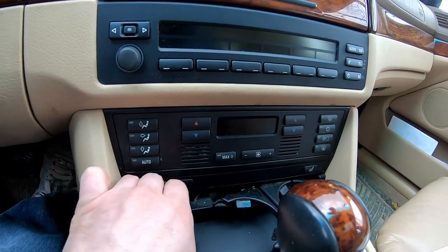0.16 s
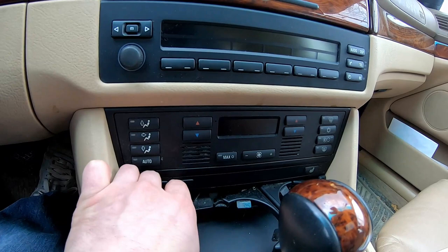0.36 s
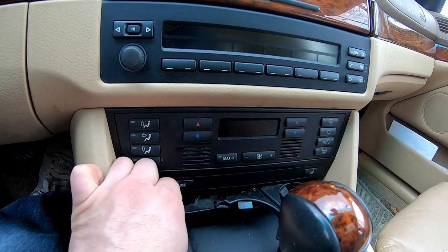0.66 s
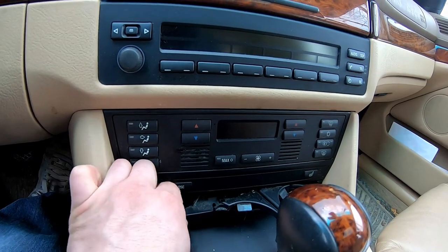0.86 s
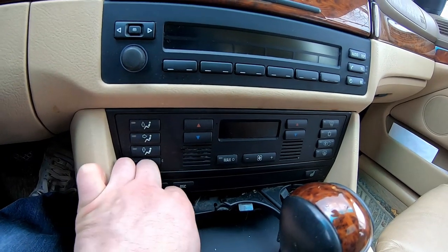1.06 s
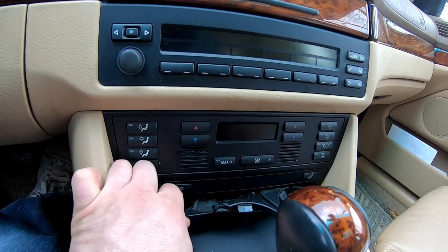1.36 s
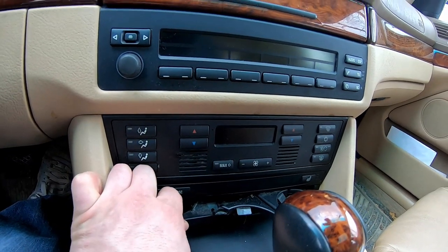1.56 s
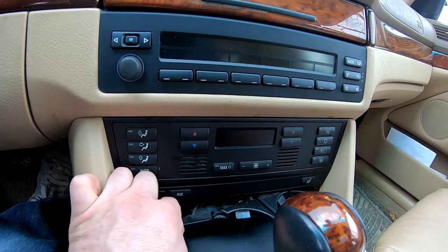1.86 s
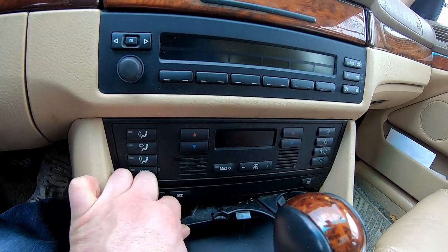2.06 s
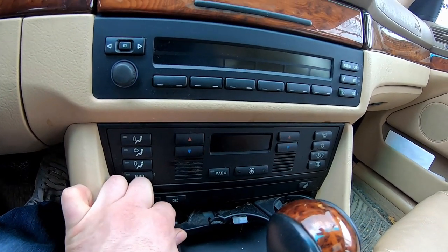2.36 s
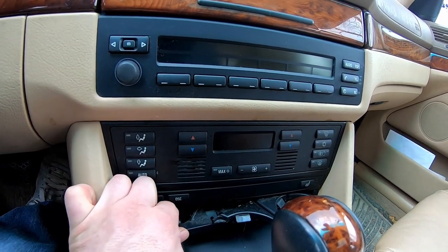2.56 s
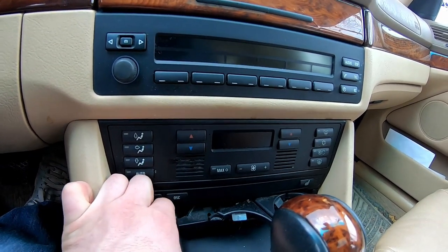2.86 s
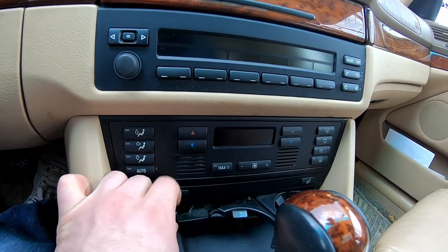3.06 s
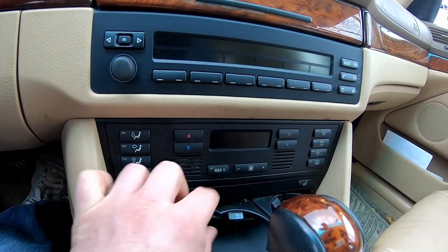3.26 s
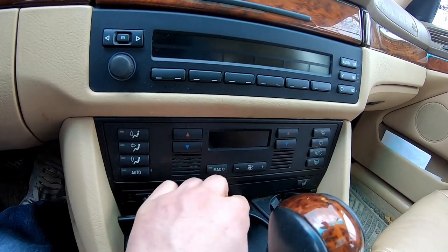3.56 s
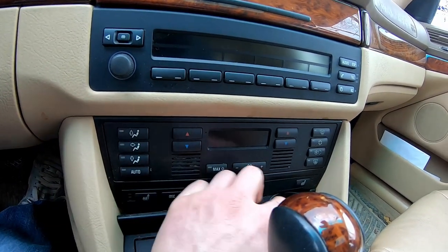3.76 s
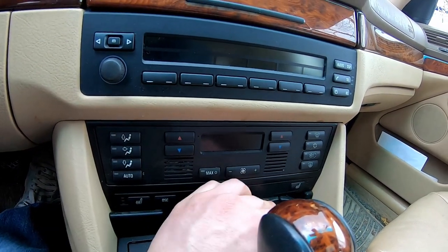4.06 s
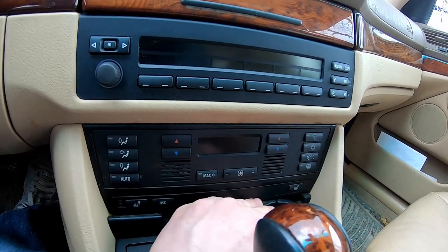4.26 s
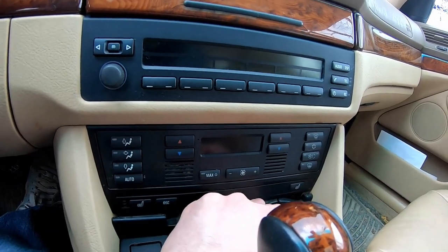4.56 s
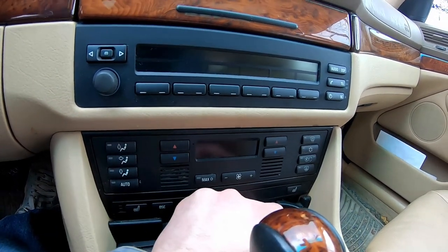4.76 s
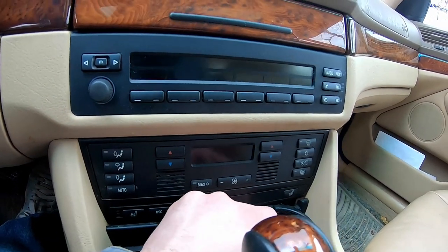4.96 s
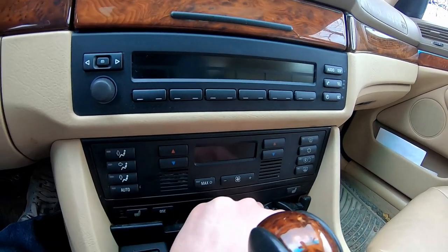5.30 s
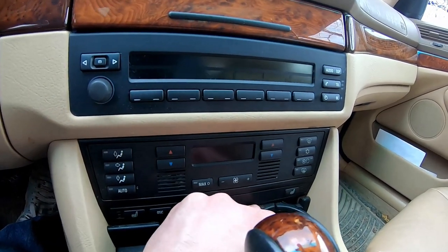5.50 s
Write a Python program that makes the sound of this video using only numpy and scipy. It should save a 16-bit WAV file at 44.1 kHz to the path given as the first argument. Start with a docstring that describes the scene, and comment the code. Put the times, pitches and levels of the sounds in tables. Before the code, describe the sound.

A plastic trim piece is worked loose by hand from a car's center console, heard close up in the quiet, closed cabin with almost no echo. Light ticks and soft rubbing open the scene. At about 0.7 seconds comes the loudest snap, with a hollow knock and a brief rattle. Faint ticks follow, then a click at 1.8 and another sharp snap and knock at 2 seconds, after which a loose part buzzes briefly. It goes quieter until a third snap and thump at 2.9 seconds. From there the work gets busier: short scrapes, clicks and knocks stand out around 3.5, 4.1 and 4.4 seconds, and smaller clusters of clicks and rattles run from 4.7 to 5.5 seconds. Between the snaps, hand and sleeve rub softly over the plastic.

```python
"""A plastic trim piece is worked loose from a car's centre console by hand, close up in the closed cabin.
Clips snap and edges tick, ringing the panel; freed parts chatter against their seats.
The hollow console knocks and sets the cabin air booming, and the piece scrapes in short stick-slip runs.
Hand and sleeve rub over the plastic in between; the upholstered cabin adds only a short tail."""
import sys
import numpy as np
from scipy import signal
from scipy.fft import rfft, irfft
from scipy.io import wavfile
from scipy.ndimage import uniform_filter1d

SR = 44100
rng = np.random.default_rng(int(sys.argv[2]) if len(sys.argv) > 2 else 0)


def master_out(mix):
    """Clip the mix to full scale and print it as 16-bit PCM to the path in sys.argv[1]."""
    frames = np.transpose(np.atleast_2d(mix))
    ceiling = np.clip(frames, -1, 1)
    pcm = np.round(ceiling * 32767).astype(np.int16)
    wavfile.write(sys.argv[1], SR, pcm)


N = 248503
TIME = np.arange(N) / SR
AGE = TIME[:SR // 2]  # seconds since the start of one hit

# ring of the trim panel: f/Hz, nominal width/Hz, weight/dB (applied at half)
PANEL_MODES = [(784, 78, 2.5), (905, 91, -11.5), (1118, 45, -14.5), (1346, 13, -14), (1824, 23, -12),
               (2104, 51, -14.5), (2432, 45, -6.5), (3085, 32, -9.5), (3394, 42, -14), (3470, 75, -5.5),
               (3780, 97, -12.5), (4100, 67, -11), (4230, 42, -24), (4460, 52, -14), (4940, 64, -3),
               (6800, 71, -20.5), (7200, 44, -26.5), (7640, 27, -13.5), (8430, 160, -18)]
# tone of the plastic: f/Hz, level/dB
PLASTIC_EQ = [(180, -22.5), (300, 1.5), (391, -4.5), (573, -13.5), (798, -16.5), (1010, -13), (1380, -8),
              (1630, -13), (2120, -15), (2640, -16), (3610, -18.5), (6040, -27), (8280, -25.5),
              (10300, -39.5), (15800, -60.5)]
# tone of the cabin's air bed: f/Hz, level/dB
CABIN_EQ = [(12, -40), (20, 6), (55, -2.5), (113, -14.5), (182, -4), (570, -23.5), (775, -16.5),
            (2120, -26), (7440, -29.5), (15800, -50.5)]
# tone of skin and cloth: f/Hz, level/dB
CLOTH_EQ = [(59, -39.5), (100, -7), (224, 10), (500, -14.5), (619, -11), (925, -16), (1030, -29),
            (1270, -10.5), (1860, -11.5), (2560, -9.5), (3510, -15.5), (5970, -28.5), (8030, -22.5),
            (14500, -48), (15800, -60.5)]
# hand sliding over the plastic: t/s, level/dB, treble level/dB
RUB_LEVELS = [(0.0, -50.5, -58.5), (0.3, -55.5, -84), (0.61, -52, -65.5), (0.92, -63, -76),
              (1.46, -67.5, -65), (1.79, -66, -75), (1.99, -51, -85), (2.16, -61.5, -77),
              (2.51, -70.5, -79.5), (2.92, -84, -80.5), (3.07, -61.5, -80), (3.42, -59.5, -60.5),
              (3.65, -49, -54.5), (4.08, -54.5, -57), (4.23, -64.5, -63.5), (4.37, -58, -70),
              (4.58, -64.5, -68), (5.33, -57, -64), (5.43, -56, -71), (5.63, -56, -63)]
# sleeve brushing past: middle t/s, level/dB, half length/s
SLEEVE_SWISHES = [(.85, -72.5, .03), (1.46, -73, .08), (1.79, -72, .05), (2.666, -64.5, .05)]
# an edge dragging over its seat: middle t/s, level/dB, half length/s, treble re mids/dB
EDGE_SCRAPES = [(.09, -49, 0.0087, -27), (0.381, -50, 0.012, -12), (.665, -29.5, 0.0084, -10),
                (1.029, -54.5, .017, 4), (1.138, -44, 0.0096, -4), (1.98, -43, 0.0094, -20),
                (2.099, -59.5, 0.042, -12), (2.896, -52, .008, -8.5), (3.136, -39, 0.013, -4),
                (3.172, -44, 0.019, -0.5), (3.295, -41, .012, 1), (3.531, -29, 0.014, -14),
                (3.827, -47.5, 0.029, -7), (4.032, -50.5, .025, -10), (4.121, -23.5, 0.0034, -18),
                (4.17, -36.5, 0.0096, -11.5), (4.23, -54, 0.015, 2.5), (4.385, -30, .0013, -21),
                (4.751, -49, .0065, -1), (4.885, -45, 0.015, -9), (5.226, -50, 0.014, -10),
                (5.323, -41, 0.017, -7), (5.45, -51.5, 0.028, -8), (5.589, -50, 0.037, -25)]
# clips and edges snapping: t/s, level/dB, body re mids/dB, treble re mids/dB, ring f/Hz, crack/dB
CLIP_SNAPS = [(0.082, -38, -0.5, -30, 826, 10), (.185, -36.5, 3, -19, 815, -3),
              (.2918, -42.5, -9, -20, 760, 9), (.3282, -43, -21.5, -20.5, 1262, 9),
              (.4708, -42.5, 3, -18, 1550, -2), (0.6713, -12.5, -2.5, -11.5, 1360, -3),
              (0.6722, -13.5, -6, -21, 1860, 4), (.6784, -27, 0, -5.5, 785, -14),
              (0.7253, -21.5, -6, -14, 2170, 9), (.7994, -46.5, 0, -27, 750, 14),
              (1.0123, -49.5, -2.5, 6.5, 784, -13), (1.0498, -45.5, -1.5, -6, 3140, 2),
              (1.104, -47, -9, -27, 795, -14), (1.1259, -33.5, -5, -31, 2430, 10),
              (1.1677, -41.5, -22, -10, 3150, 8), (1.176, -39.5, -22, -11, 2250, 19),
              (1.1856, -38.5, -27, -12, 2100, 12), (1.196, -53, 11, -20, 1140, 7),
              (1.241, -54.5, 6, -22, 810, 0), (1.563, -48, 5.5, -9.5, 680, 8),
              (1.716, -50.5, 2, -23, 1440, -16), (1.8343, -25.5, -9.5, -2.5, 2040, 1),
              (1.938, -53.5, 11, -2, 1170, -5), (1.9821, -12.5, -1.5, -24, 1050, 12),
              (1.9881, -23.5, 5, -11.5, 908, 6), (2.0121, -33.5, -9, 0.5, 700, -3),
              (2.0391, -27.5, -4, -15, 1240, 14), (2.0545, -31.5, 0.5, -16.5, 1270, -4),
              (2.2343, -57.5, -5, -24, 1830, -3), (2.3109, -40, -9, -13, 1170, 12),
              (2.386, -50.5, -14, -9, 2190, 5), (2.4682, -57, -9, -6, 1220, -4),
              (2.9107, -15.5, -2.5, -17, 1120, 1.5), (2.9339, -34.5, 3, -5.5, 740, -2),
              (2.9502, -33, 1.5, -8.5, 1220, -13), (2.9855, -33, -6, -1, 5100, 6),
              (2.9924, -39.5, 0, -10, 1220, 0), (3.1309, -39.5, 5.5, -7, 1840, 6),
              (3.4851, -34.5, -2, -8.5, 3970, -7), (3.5141, -42.5, 17.5, -18, 990, -12),
              (3.5277, -24.5, -6, -14, 950, 6), (3.564, -29.5, 1, -7.5, 820, 5.5),
              (3.6967, -37, -2.5, -22, 1000, 26), (3.7742, -43.5, -13, 2.5, 3460, -13),
              (4.0821, -33, 0.5, -18, 945, -2), (4.1218, -21.5, -2.5, -9, 760, -6),
              (4.1496, -24, -2.5, -15, 1250, -9), (4.1978, -33.5, .5, -15, 2460, 3),
              (4.3228, -45.5, -1, -3.5, 1080, -12), (4.3714, -41, -16, -7, 920, -17),
              (4.3823, -17, -15.5, -10.5, 940, 8.5), (4.4172, -28, 2.5, -11, 767, 8),
              (4.747, -28, -2.5, -7.5, 1737, 0), (4.859, -32, 3.5, -14.5, 1340, -12),
              (4.869, -33, 2.5, -13, 780, -23), (4.9905, -48, -2, -19, 884, 7),
              (5.1005, -43.5, -12, 1, 3300, 6), (5.2308, -33.5, -6, 0, 3530, -6),
              (5.2418, -26, 2, -24, 1120, -9), (5.256, -29.5, -0.5, -4, 910, -19),
              (5.4125, -32, 1, -12, 850, -27), (5.468, -42.5, 6.5, -12, 766, -3),
              (5.4921, -38.5, -2.5, -10, 920, -27), (5.5168, -42, -6, -2.5, 1120, -4)]
# blows to the console: t/s, level/dB, f/Hz, boom send/dB, deep sway send/dB
CONSOLE_KNOCKS = [(.093, -39, 222, -12, -19), (.186, -41, 242, -4, -30), (.388, -39.5, 227, -9.5, -25),
                  (.569, -35.5, 200, -13, -31), (.671, -22.5, 264, -4, -25), (.685, -13, 239, -14, -19),
                  (.745, -36.5, 145, -8, -14), (1.126, -36, 195, -5.5, -16), (1.192, -43, 276, -12, -24),
                  (1.572, -40.5, 249, -16.5, -36), (1.986, -20.5, 226, -6.5, -9),
                  (2.008, -29, 193, -7, -14), (2.049, -38, 250, -1.5, 0.5), (2.15, -40.5, 196, -15, -30),
                  (2.913, -26, 293, -9, -5.5), (2.94, -29.5, 225, -15, -10), (2.986, -32.5, 214, -2, -16),
                  (3.134, -37.5, 235, -8.5, -15), (3.522, -28.5, 278, -27, -11),
                  (3.786, -44.5, 230, -6, -24), (4.122, -24, 199, -7, -34), (4.166, -30.5, 222, -10, -19),
                  (4.387, -38.5, 235, -2, -2.5), (4.752, -36.5, 262, -19, -22),
                  (4.867, -35.5, 234, -14, -5), (5.241, -37.5, 363, -3.5, -34), (5.253, -30, 217, -33, -21),
                  (5.344, -41.5, 198, -25, -29)]
# low modes of the cabin air, two of deep sway and then three of boom: nominal f/Hz, t60/s, level/dB
AIR_MODES = [(44.8, 0.24, -4), (65.4, 0.17, 2.5), (83, 0.05, -4.5), (111.7, 0.12, -4), (145, 0.089, -9.5)]
# loose parts buzzing: t/s, level/dB, f/Hz, t60 of the buzz/s
LOOSE_PARTS = [(0.708, -41, 1240, 0.028), (.717, -31, 878, 0.066), (.754, -54, 1180, 0.21),
               (1.563, -41.5, 650, .021), (1.566, -43, 466, 0.027), (1.984, -29, 1040, 0.017),
               (2.039, -39, 1250, 0.24), (2.042, -46.5, 743, 0.33), (2.129, -46.5, 464, 0.17),
               (2.345, -50.5, 452, 0.094), (2.44, -61, 2125, .02), (2.915, -40, 1147, 0.042),
               (2.935, -49, 1270, .15), (3.129, -34.5, 1920, 0.016), (3.17, -44.5, 1480, .13),
               (3.511, -30.5, 1157, 0.09), (4.12, -28.5, 747, 0.044), (4.383, -29, 980, 0.041),
               (4.755, -42, 380, 0.05), (4.864, -43, 780, 0.021), (5.305, -40.5, 857, 0.14),
               (5.414, -39, 878, 0.21)]
# width between the two microphone ports: f/Hz, side re mid/dB
WIDTH_EQ = [(30, -10), (130, -19.5), (300, -18), (600, -6), (2500, -7.5), (5000, -6), (8000, 1)]
# the stereo image starts narrow and opens: t/s, side level/dB
IMAGE_OPENING = [(0, -41.5), (.2, -35), (.4, -17), (.7, -8.5), (1.3, -1.5), (2, -0.5)]


def undb(db):
    """Decibels to gain."""
    return 10 ** (np.asarray(db) / 20)


def rms(x):
    """Average level, as root mean square."""
    return np.sqrt(np.mean(x ** 2))


def crest(x, size=176):
    """Level of the loudest few milliseconds."""
    return np.sqrt(uniform_filter1d(x ** 2, size, mode="constant").max())


def band(x, lo_hz, hi_hz, order=3):
    """Causal band-pass."""
    sos = signal.butter(order, [lo_hz, min(hi_hz, .45 * SR)], "band", fs=SR, output="sos")
    return signal.sosfilt(sos, x)


def response(points, size=2048):
    """Minimum-phase impulse response of an EQ curve of f/Hz, level/dB points."""
    hz, db = np.transpose(points)
    grid = np.maximum(np.fft.rfftfreq(size, 1 / SR), 1)
    curve_db = np.interp(np.log(grid), np.log(hz), db)
    cepstrum = irfft(np.log(undb(curve_db)))
    cepstrum[1:size // 2] *= 2
    cepstrum[size // 2 + 1:] = 0
    return irfft(np.exp(rfft(cepstrum)))


def through(x, impulse):
    """Pass a sound through an impulse response."""
    impulse = np.broadcast_to(impulse, x.shape[:-1] + impulse.shape)
    return signal.fftconvolve(x, impulse, axes=-1)[..., :x.shape[-1]]


def fade(t60):
    """Exponential decay, 60 dB down after t60 seconds."""
    return np.exp(-np.log(1000) * AGE / t60)


def swell(time, middle_s, half_s):
    """A bell-shaped rise and fall."""
    return np.exp(-.5 * ((time - middle_s) / half_s) ** 2)


def wobble(rate_hz):
    """Smooth random modulation: held steps, slewed twice."""
    hold = int(SR / rate_hz)
    steps = np.repeat(rng.standard_normal(N // hold + 1), hold)
    smooth = uniform_filter1d(uniform_filter1d(steps, hold), hold)[:N]
    return smooth / rms(smooth)


def add(out, s, x):
    """Mix a sound in at time s."""
    i = max(int(s * SR), 0)
    out[..., i:i + x.shape[-1]] += x[..., :N - i]


def resonate(x, hz, width_hz):
    """Ring one damped mode."""
    b, a = signal.iirpeak(min(hz, .45 * SR), hz / width_hz, fs=SR)
    return signal.lfilter(b, a, x)


def accent(x, hz, ring_db):
    """The touched part's own mode stands out of the sound; high modes die sooner."""
    ring = resonate(x, hz, width_hz=70 + .008 * hz)
    return x + undb(ring_db) * .5 * ring / crest(ring[0])


def voiced(pair, body_db, treble_db):
    """Where and how hard the contact is sets the balance of body, mids and treble."""
    parts = band(pair, 440, 1896), band(pair, 1560, 5000), band(pair, 5090, 13000)
    return sum(undb(db) * part / crest(part[0]) for part, db in zip(parts, (body_db, 0, treble_db)))


def trim_panel(ring_db=5, damping=.95):
    """The trim's impulse response: a direct crack and its damped modes."""
    impulse = signal.unit_impulse(len(AGE))
    for hz, width_hz, db in PANEL_MODES:
        loss = np.pi * width_hz * damping
        mode = np.exp(-loss * AGE) * np.cos(2 * np.pi * hz * AGE)
        impulse += undb(ring_db + db / 2) * 2 * loss / SR * mode
    return through(impulse, response(PLASTIC_EQ))[:SR // 8]


def cabin_air(level_db=-65.5, side_db=-2):
    """The faint steady air bed of the parked car, coming from all around."""
    mid, side = through(rng.standard_normal((2, N)), response(CABIN_EQ))
    side = undb(side_db) * side
    return undb(level_db) * np.array([mid + side, mid - side]) / rms(mid)


def hand_rub(trim, panel_db=-5, grain_db=2, flutter_db=.8, shift_db=1.5, shake_db=3.5, lurch_db=5.5):
    """Skin and cloth slide in fine grains that ring the panel; harder rubbing shakes the console more."""
    times, *levels = np.transpose(RUB_LEVELS)
    level_db, treble_db = (np.interp(TIME, times, db) for db in levels)
    grains = rng.standard_normal((2, N))
    grains *= undb(grain_db * rng.standard_normal(N) + flutter_db * wobble(70))
    cloth, ring = through(grains, response(CLOTH_EQ)), through(grains, trim)
    friction = cloth / rms(cloth) + undb(panel_db) * ring / rms(ring)
    # six bands waver separately, so the colour keeps shifting
    edges_hz = np.geomspace(450, 5500, num=7)
    slide = sum((-1) ** k * band(friction, *edges_hz[k:k + 2], order=2) * undb(shift_db * wobble(45))
                for k in range(6))
    sleeve = sum(undb(db) * swell(TIME, middle_s, half_s) for middle_s, db, half_s in SLEEVE_SWISHES)
    layers = [(slide, undb(level_db - 3)),
              (band(friction, 100, 420), undb(level_db + 1 + shake_db * wobble(35))),  # rumble
              (band(friction, 5100, 15000), undb(treble_db - 4.5) + sleeve),  # hiss
              (band(grains, 30, 83), undb(level_db - 7 + lurch_db * wobble(14)))]  # sway
    return sum(gain * layer / rms(layer[0]) for layer, gain in layers)


def finger_ticks(trim, count=170, spread_db=1.5, t60=.03):
    """Sliding fingers nudge seams and buttons; each tiny tick has its own pitch and rides the rub level."""
    out = np.zeros((2, N))
    rub_s, rub_db, _ = np.transpose(RUB_LEVELS)
    for when, pitch, size in rng.random((count, 3)):
        s, hz = when * N / SR, 700 * 4.5 ** pitch
        db = np.interp(s, rub_s, rub_db) + spread_db * (2 * size - 1)
        force = rng.standard_normal((2, len(AGE))) * fade(t60)
        tick = voiced(through(force[:, :SR // 16], trim), body_db=0, treble_db=-13)
        add(out, s, undb(db) * accent(tick, hz, ring_db=4))
    return out


def edge_scrapes(trim, slips_per_s=600, spread_db=5, hiss=.41, catch_db=2, sizzle_db=2):
    """A run of tiny slips swells and dies as the edge drags, catching and letting go on the way."""
    out = np.zeros((2, N))
    for middle_s, db, half_s, treble_db in EDGE_SCRAPES:
        size, noise = rng.standard_normal((2, 2, len(AGE)))
        slipping = rng.random(len(AGE)) < slips_per_s / SR
        slips = slipping * np.sign(size) * undb(spread_db * np.abs(size))
        lead_s = np.pi * half_s
        pressure = swell(AGE, lead_s, half_s) * undb(catch_db * wobble(300)[:len(AGE)])
        scrape = through((slips + hiss * noise) * pressure, trim)
        add(out, middle_s - lead_s, undb(db) * voiced(scrape, body_db=-2, treble_db=treble_db))
    # slips are shorter than snaps, so they reach higher
    return out + undb(sizzle_db) * band(out, 10500, 18000, order=2)


def clip_snaps(trim, gain_db=-4, grit_db=3, tail_db=-20, sizzle_db=-4):
    """Each snap cracks and sets off dense, fast-dying plastic modes; the cabin returns a faint tail."""
    out = np.zeros((2, N))
    for s, db, body_db, treble_db, hz, crack_db in CLIP_SNAPS:
        dense, grit, echo = rng.standard_normal((3, 2, len(AGE)))
        envelope = fade(t60=.081) + undb(crack_db) * fade(t60=.015)
        burst = dense * undb(grit_db * np.tanh(grit)) * envelope
        tail = undb(tail_db) * echo * fade(t60=.27)
        snap = voiced(through(burst + tail, trim), body_db, treble_db)
        ring_db = -8 - .2 * db  # a hard snap is mostly crack, a light one has more of the part's ring
        add(out, s, undb(db + gain_db) * accent(snap, hz, ring_db))
    return out + undb(sizzle_db) * band(out, 14000, 15000, order=2)


def console_knocks(rise_s=.0028, shake_db=-18, air_db=-2, rebound_s=.024, rebound_pitch=.92):
    """The hollow console swings a few cycles, pushes the cabin air and rocks back, softer and lower."""
    out = np.zeros(N)
    for s, db, hz, boom_db, sway_db in CONSOLE_KNOCKS:
        blow = (s, hz, 0, air_db)
        rebound = (s + rebound_s, hz * rebound_pitch, -9, air_db - 3.5)
        for start_s, swing_hz, shell_db, push_db in (blow, rebound):
            swing = np.sin(2 * np.pi * swing_hz * AGE) * (1 - np.exp(-AGE / rise_s)) * fade(t60=.059)
            shake = band(rng.standard_normal(len(AGE)), 190, 380) * fade(t60=.17)
            shell = swing / crest(swing) + undb(shake_db) * shake / crest(shake)
            boom = undb(boom_db) * cabin_boom(AIR_MODES[2:], swell_s=.014)
            sway = undb(sway_db) * cabin_boom(AIR_MODES[:2], swell_s=.15)
            add(out, start_s, undb(db) * (undb(shell_db) * shell + undb(push_db) * (boom + sway)))
    return out


def cabin_boom(modes, swell_s, detune=.11):
    """Low modes of the cabin air bloom late and linger, detuned at random on each hit."""
    ring = np.zeros(len(AGE))
    for k, (hz, t60, db) in enumerate(modes):
        detuned_hz = hz * (1 + detune * rng.standard_normal())
        ring += (-1) ** k * undb(db) * np.sin(2 * np.pi * detuned_hz * AGE) * fade(t60)
    ring *= 1 - np.exp(-AGE / swell_s)
    return ring / crest(ring)


def part_chatter(touch_db=-21):
    """A freed part buzzes against its seat, ever more lightly, and rings in one mode."""
    out = np.zeros((2, N))
    for s, db, hz, t60 in LOOSE_PARTS:
        force = rng.standard_normal((2, len(AGE))) * fade(t60)
        ring = band(resonate(force, hz, width_hz=60), hz / 1.7, hz * 1.1, order=1)
        touch = band(force, hz / 2, hz * 2, order=2)
        add(out, s, undb(db) * (ring / crest(ring[0]) + undb(touch_db) * touch / crest(touch[0])))
    return out


def to_stereo(pair):
    """Mid and side to left and right; the microphone ports differ mostly in the treble."""
    side = through(pair[1], response(WIDTH_EQ))
    return np.array([pair[0] + side, pair[0] - side])


def scene(right_db=.66):
    """The action sits straight ahead over the air bed, the plastic a touch to the right."""
    trim = trim_panel()
    plastic = clip_snaps(trim) + edge_scrapes(trim) + part_chatter() + finger_ticks(trim)
    pan = undb([[-right_db / 2], [right_db / 2]])
    return pan * to_stereo(plastic) + console_knocks() + to_stereo(hand_rub(trim)) + cabin_air()


def record(dry, top_hz=15800):
    """The image opens from near mono over the first two seconds; a steep low-pass cuts the top."""
    mid, side = (dry[0] + dry[1]) / 2, (dry[0] - dry[1]) / 2
    side *= undb(np.interp(TIME, *np.transpose(IMAGE_OPENING)))
    low_pass = signal.ellip(10, .2, 80, top_hz, fs=SR, output="sos")
    return signal.sosfilt(low_pass, [mid + side, mid - side])


dry = scene()
out = record(dry)
master_out(out)
```